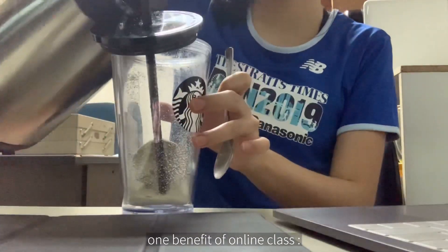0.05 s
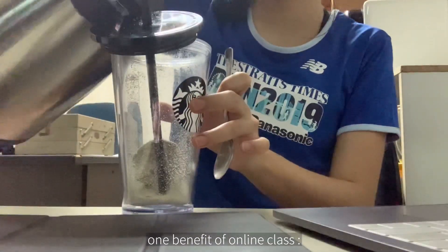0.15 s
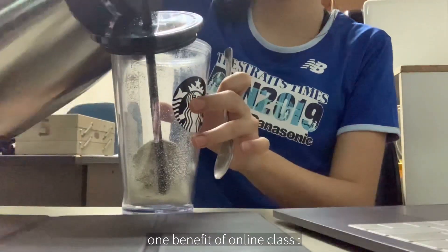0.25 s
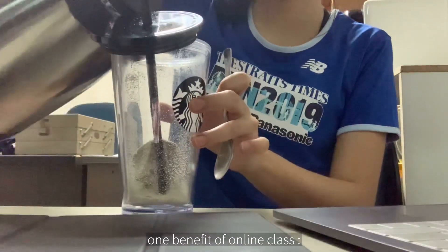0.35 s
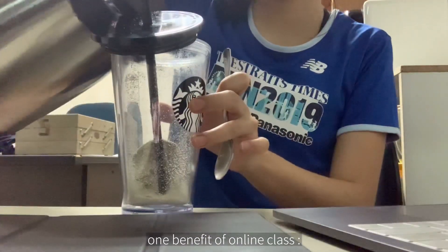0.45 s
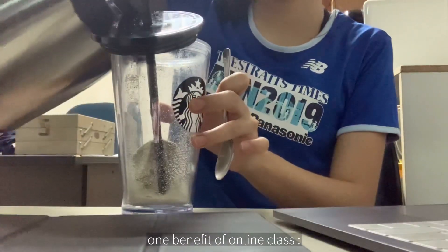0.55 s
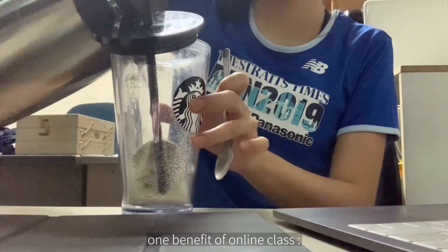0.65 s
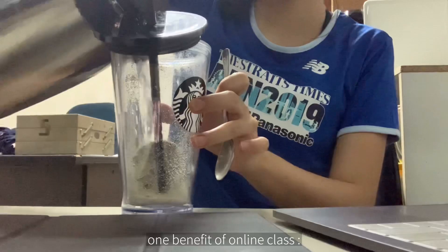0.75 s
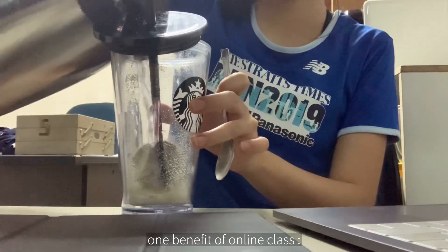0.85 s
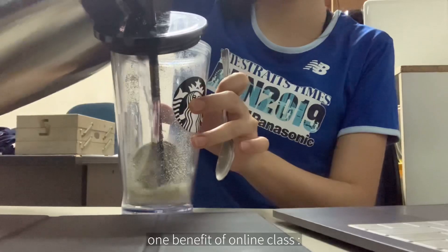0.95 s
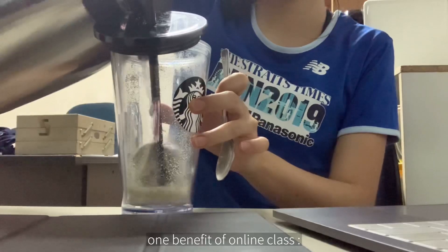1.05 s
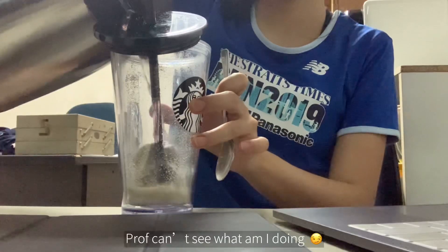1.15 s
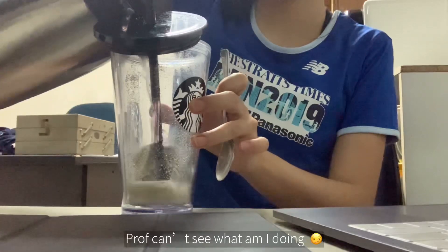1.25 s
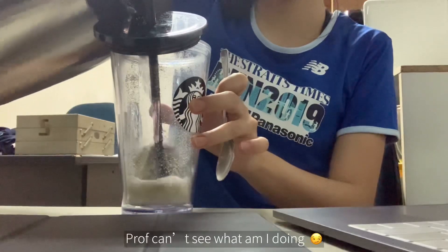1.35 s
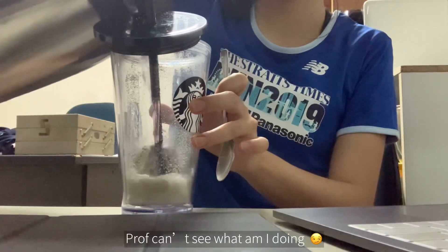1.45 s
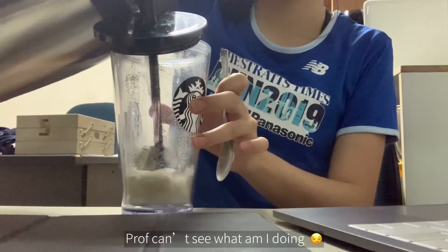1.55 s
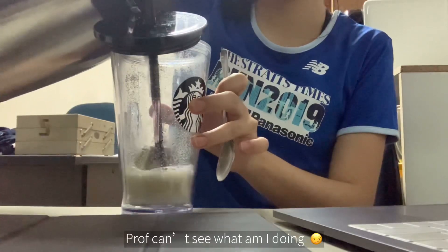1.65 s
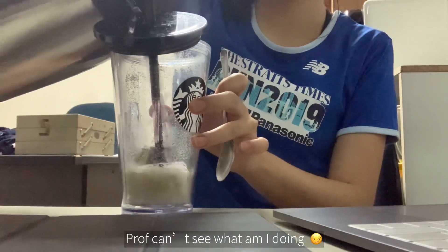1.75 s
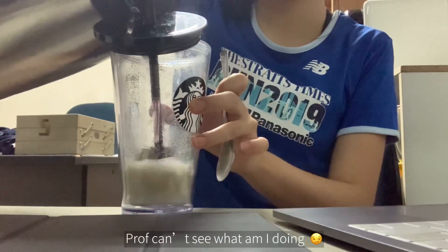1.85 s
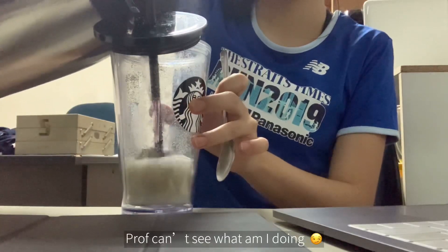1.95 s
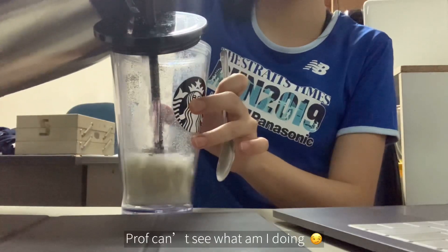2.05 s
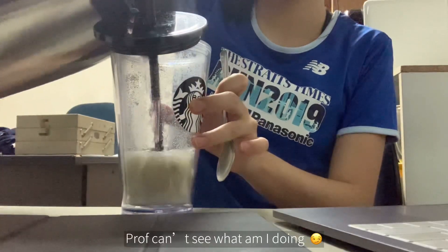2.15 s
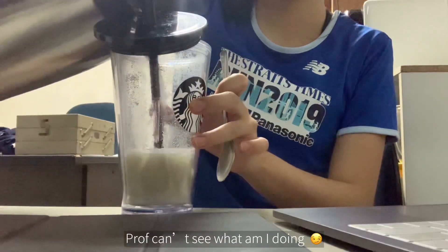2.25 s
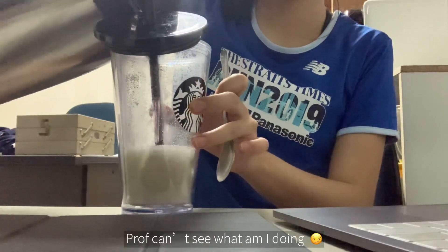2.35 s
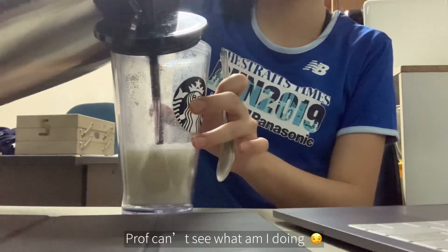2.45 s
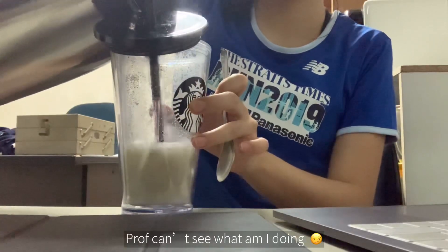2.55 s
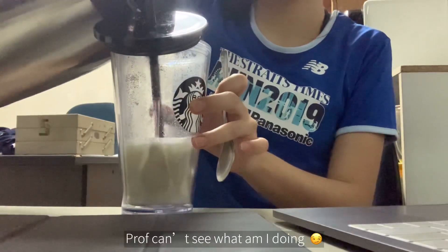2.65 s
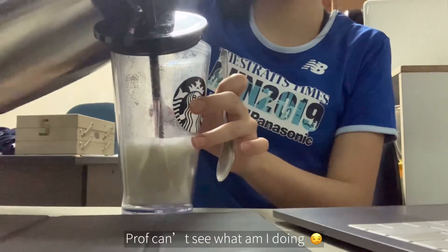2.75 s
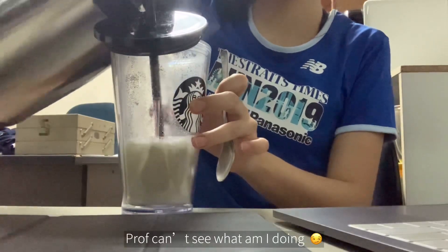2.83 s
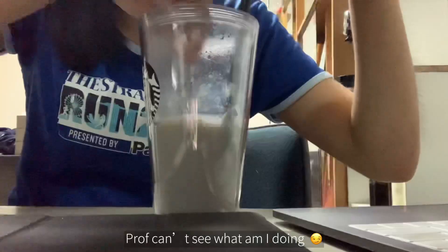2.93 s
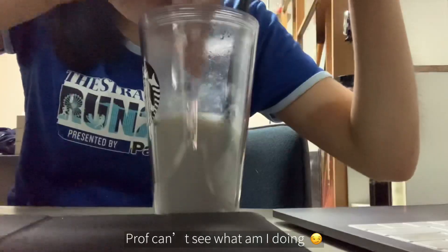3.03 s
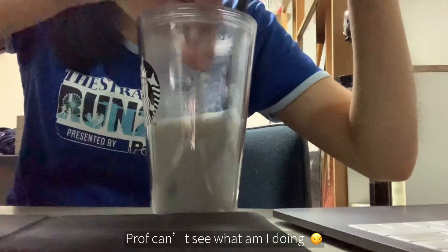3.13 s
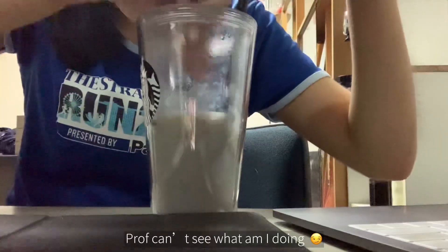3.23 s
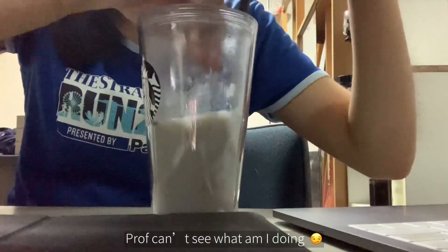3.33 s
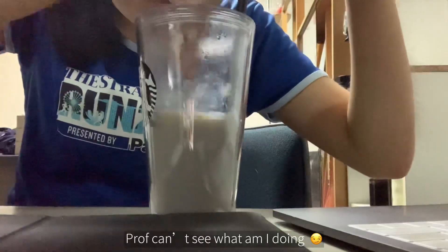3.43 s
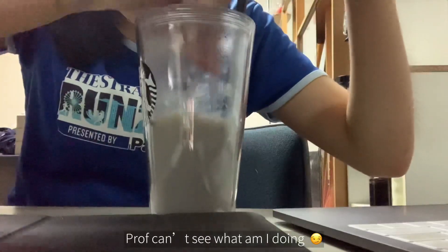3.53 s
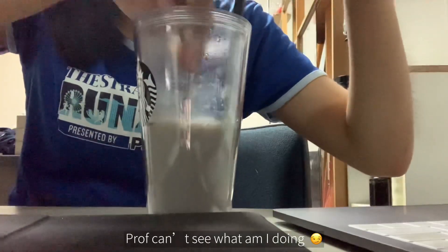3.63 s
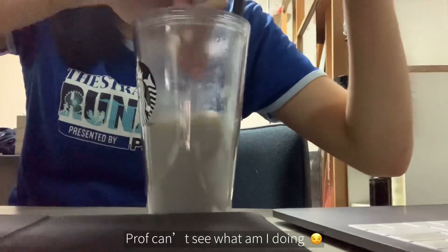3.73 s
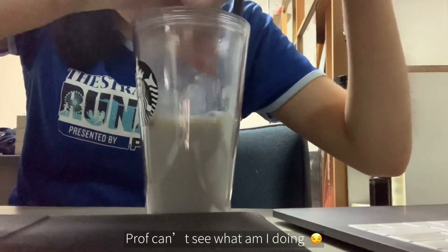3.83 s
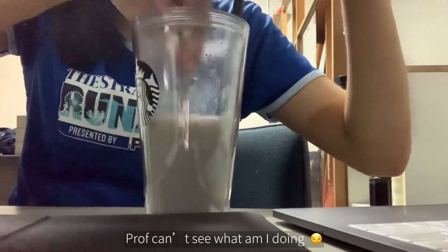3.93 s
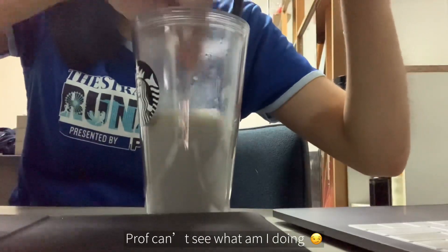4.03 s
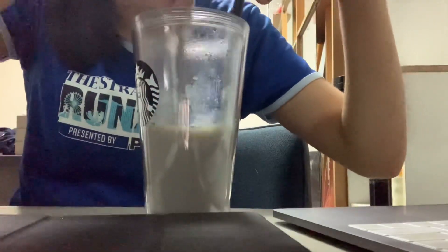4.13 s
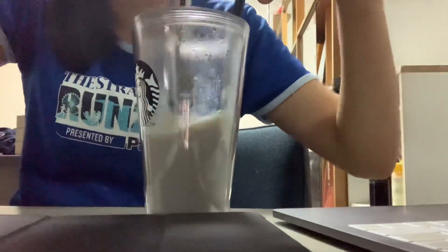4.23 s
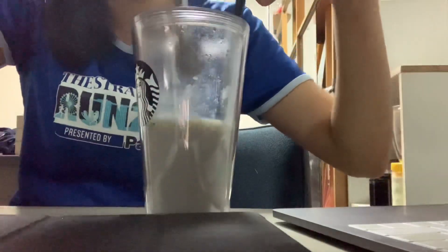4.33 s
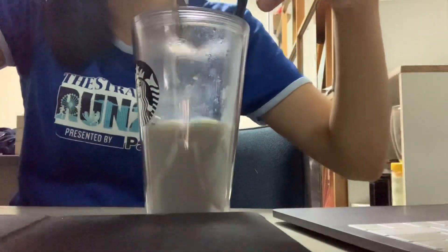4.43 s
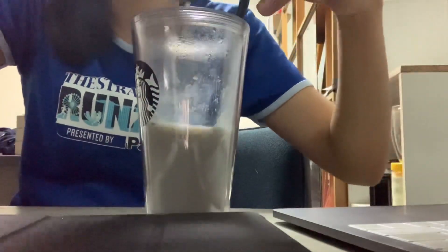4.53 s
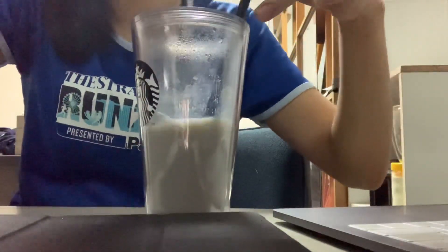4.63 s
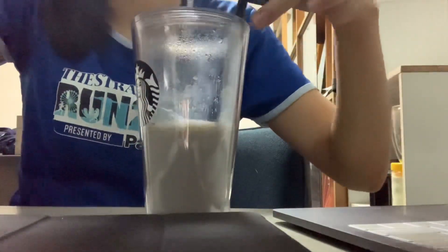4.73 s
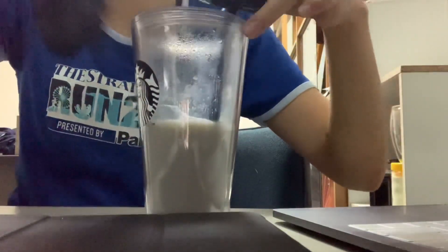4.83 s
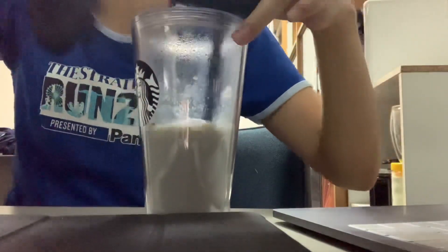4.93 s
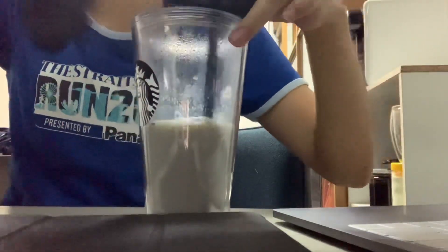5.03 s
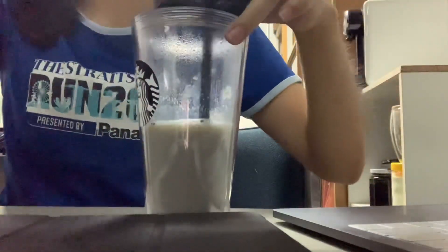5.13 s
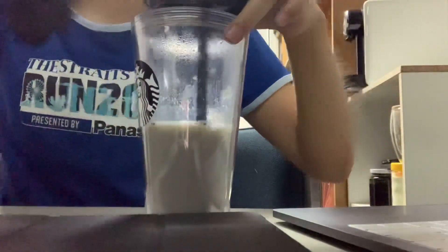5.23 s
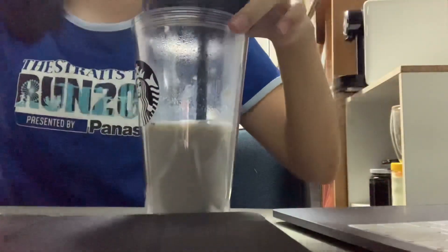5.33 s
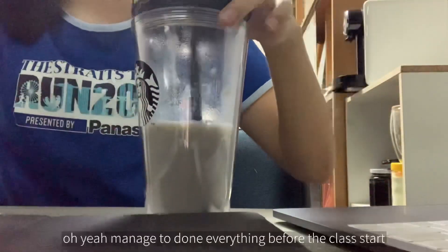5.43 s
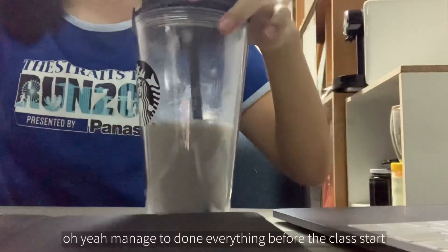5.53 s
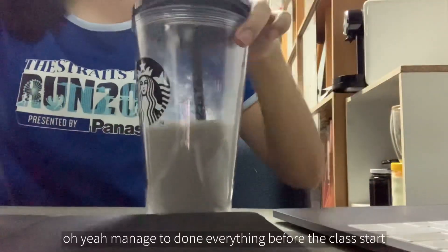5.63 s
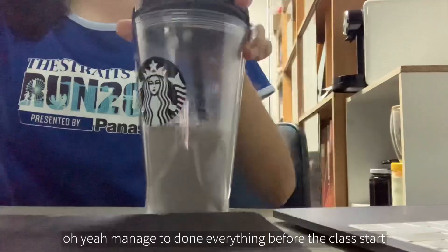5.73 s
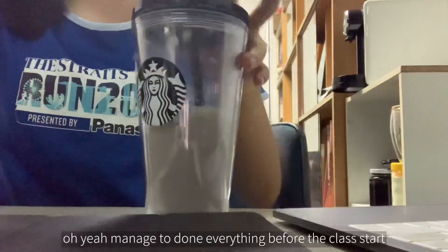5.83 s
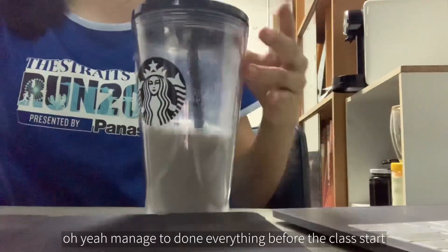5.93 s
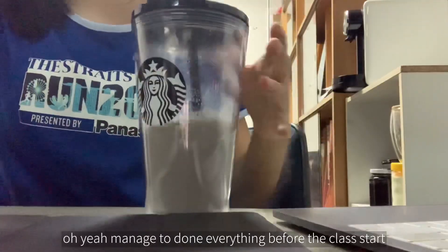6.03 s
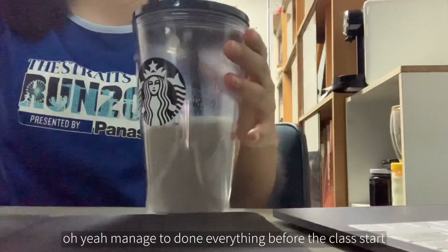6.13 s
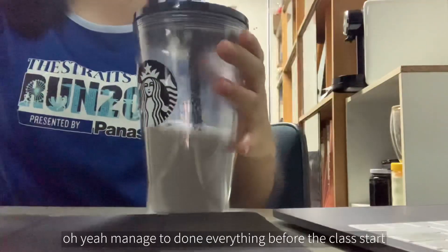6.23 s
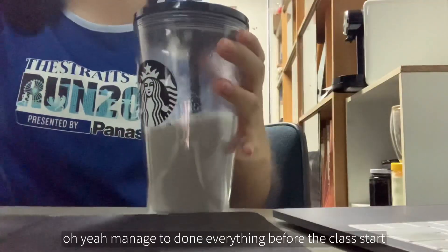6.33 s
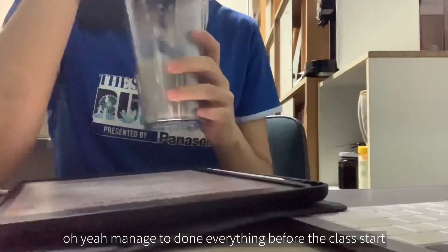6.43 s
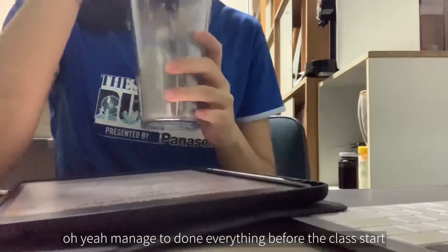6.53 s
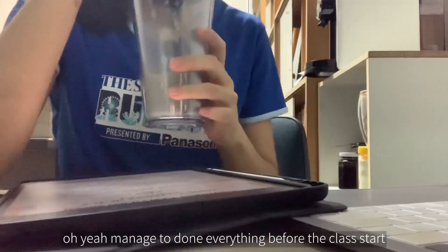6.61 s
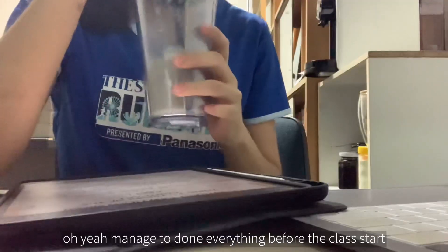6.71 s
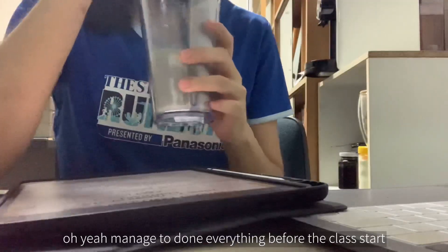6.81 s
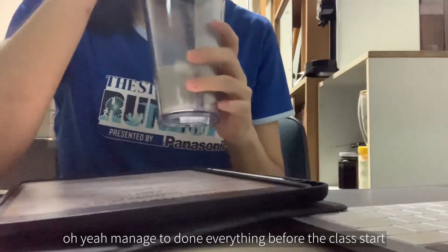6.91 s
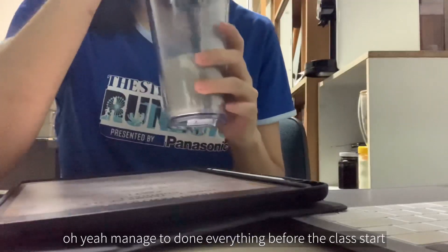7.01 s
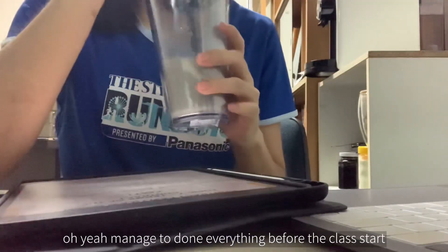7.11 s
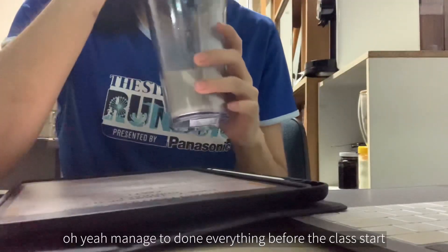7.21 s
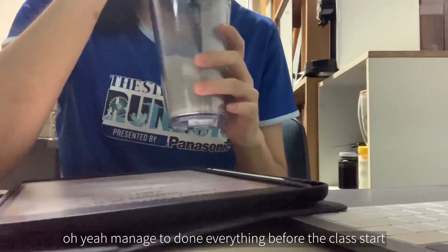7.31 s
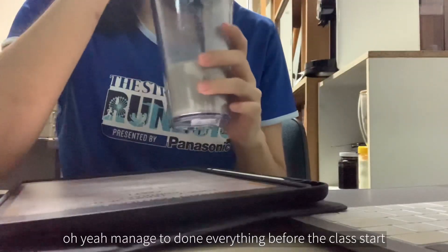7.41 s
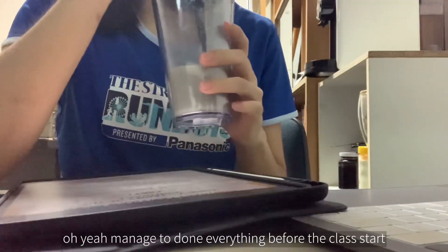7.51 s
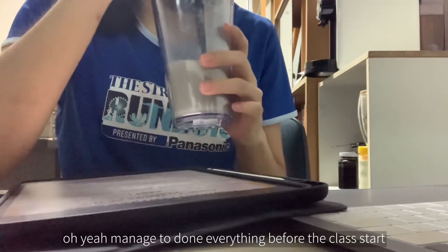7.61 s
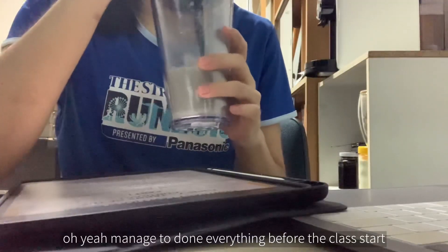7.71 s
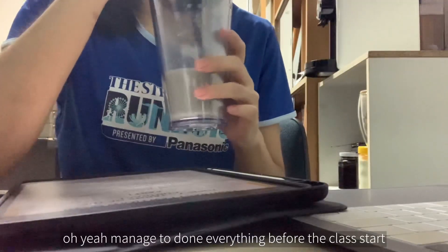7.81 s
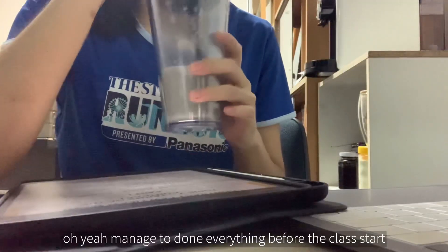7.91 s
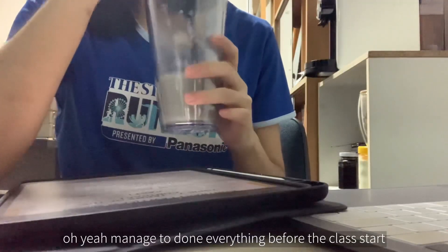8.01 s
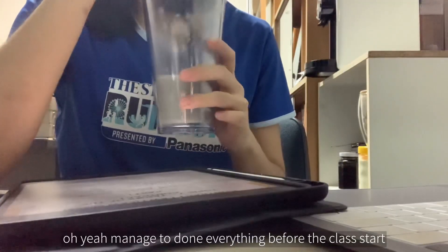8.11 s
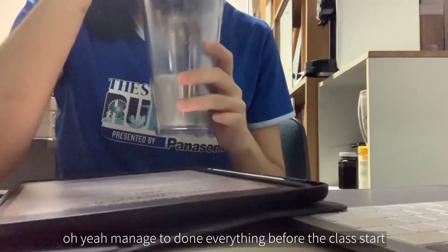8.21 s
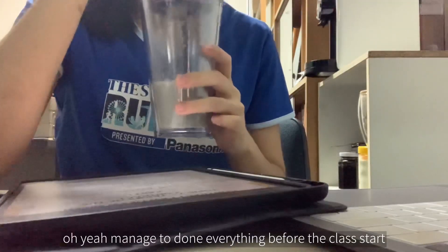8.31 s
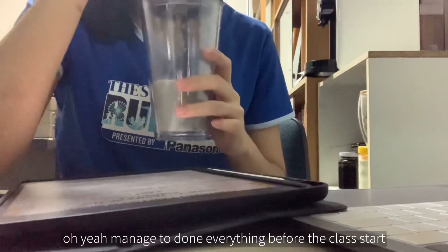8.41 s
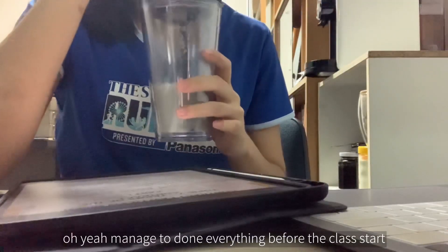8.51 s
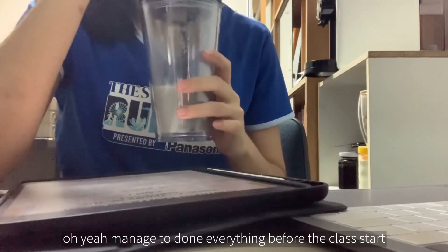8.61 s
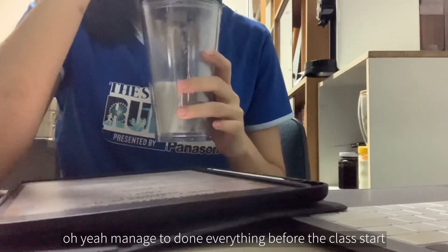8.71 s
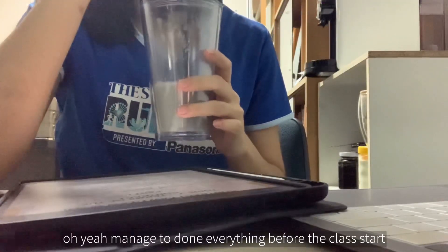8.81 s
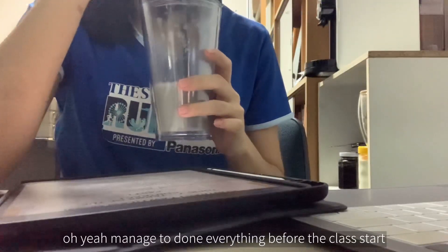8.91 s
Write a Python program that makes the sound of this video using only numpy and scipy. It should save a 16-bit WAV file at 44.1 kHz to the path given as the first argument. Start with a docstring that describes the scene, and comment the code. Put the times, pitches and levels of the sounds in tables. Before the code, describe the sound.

Close to the microphone at a desk in a small humming room, two soft thumps precede water pouring from a flask into a plastic tumbler, its hollow tone rising. A spoon stirs quickly with scrapes, clinks and hard plastic knocks. A straw ticks, a lid rubs into place, the desk thumps with paired clicks, then a short wet straw gurgle fades to near quiet.

```python
"""A small room hums and rumbles as shaped noise and wavering sines; two soft thumps ring the desk's modes.
Water runs from a flask onto powder in a plastic tumbler: noise grains patter, bubbles ring and the air column climbs.
A spoon scrapes in runs of tiny slips, clinks and knocks the side; the straw then ticks and scrapes by the lid.
The lid is rubbed on, the desk takes more thumps and two double clicks of short noise, and froth grains gurgle through
the straw in a short sip, with plops; a knock, a faint slide on plastic and a faint sine whistle end it."""
import sys
import numpy as np
from scipy import signal
from scipy.fft import rfft, irfft, next_fast_len
from scipy.io import wavfile
from scipy.ndimage import uniform_filter1d, map_coordinates

SR = 44100
rng = np.random.default_rng(int(sys.argv[2]) if len(sys.argv) > 2 else 0)


def dump_mix(stems):
    """Bounce the given channels to the path in sys.argv[1] as a 16-bit WAV at rate SR."""
    frames = np.atleast_2d(stems).T  # one column per channel
    limited = np.clip(frames, -1, 1)  # hard clip at full scale
    pcm = np.round(limited * 32767).astype(np.int16)
    wavfile.write(sys.argv[1], SR, pcm)


N = 395136

# Source levels are set ahead of the trims in scene(); spectrum levels are relative, as colours are scaled to rms 1.


def amp(db):
    """Decibels to gain."""
    return 10 ** (np.asarray(db) / 20)


def unit(x):
    """Scale to rms 1."""
    return x / np.sqrt(np.mean(x ** 2) + 1e-20)


def clock(size):
    """Seconds for each sample."""
    return np.arange(size) / SR


def along(points, hz):
    """Read a curve of (Hz, value) points on a log frequency axis."""
    f, v = np.transpose(points)
    return np.interp(np.log(hz + 1), np.log(f + 1), v)


def wobble(rate):
    """A smooth random curve, rate knots a second."""
    coarse = clock(N)[::64]
    knots = rng.standard_normal(1024)
    curve = map_coordinates(knots, [coarse * rate], mode="wrap")
    return np.interp(clock(N), coarse, curve)


def drift(x, swing_s, rate):
    """A randomly moving delay slides resonances up and down."""
    return map_coordinates(x, [np.arange(N) + SR * swing_s * wobble(rate)], mode="nearest")


def filtered(x, response):
    """Multiply the spectrum of x by a response of frequency."""
    n = x.shape[-1]
    padded = next_fast_len(n + SR // 8, real=True)
    hz = np.fft.rfftfreq(padded, 1 / SR)
    return irfft(rfft(x, padded) * response(hz), padded)[..., :n]


def coloured(x, spectrum):
    """Shape x by (Hz, dB) points, at rms 1."""
    return unit(filtered(x, lambda hz: amp(along(spectrum, hz))))


def resonate(x, modes):
    """Pass x through (Hz, width Hz, dB) resonances of alternating sign, at rms 1."""
    def response(f):
        total = 0
        for k, (centre, width, db) in enumerate(modes):
            band = 1j * f * width / (centre * centre - f * f + 1j * f * width)
            total = total + (-1) ** k * amp(db) * band
        return total
    return unit(filtered(x, response))


def grit(rate, spread_db):
    """Tiny random impulses of uneven size, about rate a second, at rms 1."""
    there = rng.random(N) < rate / SR
    size = amp(spread_db * np.clip(rng.standard_normal(N), -2, 2))
    return unit(there * rng.choice([-1, 1], N) * size)


def add(track, s, sound):
    """Mix a sound in at s seconds."""
    part = track[max(round(s * SR), 0):][:len(sound)]
    part += sound[:len(part)]


def gestures(rows, attack_s, sag_db_per_s, release_t60_s):
    """Gain over time: each move sets in, sags while it is held and dies away."""
    gain, t = np.zeros(N), clock(SR)
    for start_s, length_s, level_db in rows:
        sag_db = sag_db_per_s * np.minimum(t, length_s)
        release_db = 60 * np.maximum(t - length_s, 0) / release_t60_s
        add(gain, start_s, np.minimum(t / attack_s, 1) * amp(level_db - sag_db - release_db))
    return gain


def bursts(rows, spectrum, t60, variety):
    """Short noisy impacts that die at once, each colour varied by some dB at every point."""
    x, t = np.zeros(N), clock(SR // 6)
    for start_s, level_db in rows:
        colour = [(hz, db + variety * rng.standard_normal()) for hz, db in spectrum]
        add(x, start_s, amp(level_db - 60 * t / t60) * coloured(rng.standard_normal(len(t)), colour))
    return x


def ring(modes, pitch, attack):
    """A struck body: decaying sine modes, peak 1, with new mode strengths at each blow."""
    t = clock(SR // 3)
    x = np.zeros(len(t))
    for k, (hz, db, t60) in enumerate(modes):
        decay = amp(db + rng.normal(0, 0.9) - 60 * t / t60)
        x += (-1) ** k * decay * np.sin(2 * np.pi * hz * pitch * t)
    x = x * (1 - np.exp(-t / attack))
    return x / np.abs(x).max()


def bubble(hz, t60, glide):
    """A bubble rings from a soft start and rises in pitch as it decays."""
    t = clock(int(SR * t60) + 2)
    envelope = amp(-60 * t / t60) * (1 - np.exp(-t * hz))
    return envelope * np.sin(2 * np.pi * hz * t * (1 + glide * t / t60))


# fan noise colour: pitch_hz [Hz], level_db [dB per Hz, relative]
FAN_COLOUR = [(65, -23), (110, -6), (144, -6.5), (167, -15.5), (189, -6.5), (269, -11), (299, -8),
              (674, -27), (1430, -29.5), (1650, -33.5), (2080, -40.5), (2450, -41), (2780, -45),
              (14700, -50)]
# wavering hum tones: pitch_hz [Hz], level_db [dB]
HUM_TONES = [(48.4, -67), (134.6, -70), (199.5, -66), (301, -67.5), (398.4, -73)]
# the low rumble is quieter in the middle: start_s [s], level_db [dB]
RUMBLE_STEPS = [(0, -53), (2.9, -60), (4.1, -63), (6.6, -49)]


def background():
    """Fan noise, a wavering hum and a low rumble, alike at both ears only in the bass."""
    def pair(spectrum):
        mid, side = rng.standard_normal((2, N))
        side = filtered(side, lambda hz: amp(along([(60, -13.5), (300, 1.0), (800, 0.0)], hz)))
        return coloured(np.array([mid + side, mid - side]), spectrum)
    starts, levels = np.transpose(RUMBLE_STEPS)
    steps_db = levels[np.searchsorted(starts[1:], clock(N))]
    rumble_db = uniform_filter1d(steps_db, size=SR // 8)
    rumble_colour = [(10, -14.0), (25, 0.5), (50, 1.0), (75, 3.5), (110, -16.0), (200, -19.0), (600, -81.0)]
    rumble = amp(rumble_db) * pair(rumble_colour)
    hum = np.zeros(N)
    for pitch_hz, level_db in HUM_TONES:
        tone = np.sin(2 * np.pi * pitch_hz * clock(N) + 0.29 * wobble(3.4))
        hum += amp(level_db + 4.3 * wobble(5.1)) * np.sqrt(2) * tone
    fan = amp(-60.0) * pair(FAN_COLOUR)
    return (rumble + hum + fan) * amp([[1.6], [-1.6]])  # dB left, right


# a faint thin whistle: start_s [s], length_s [s], level_db [dB]
WHISTLES = [(8.8, .16, -77)]


def whistle():
    """A faint sine at 1770 Hz whose phase wanders a little."""
    tone = np.sin(2 * np.pi * 1770 * clock(N) + .5 * wobble(26))
    return gestures(WHISTLES, attack_s=0.0041, sag_db_per_s=6.5, release_t60_s=0.2) * tone


# fingers and straw slide on plastic: start_s [s], length_s [s], level_db [dB]
SLIDES = [(3.2, 0.16, -63.5), (3.385, 0.12, -71.5), (3.87, 0.17, -55), (4.07, 0.19, -64.5),
          (4.37, 0.22, -59.5), (4.56, 0.17, -64), (4.68, 0.45, -69), (5.13, 0.0094, -52),
          (5.18, 0.21, -61.5), (5.5, 0.447, -65), (6.12, 0.085, -63), (6.22, 0.24, -67),
          (7.52, 0.012, -56.5), (8.485, 0.039, -62.5)]
# colour of the slides: pitch_hz [Hz], level_db [dB per Hz, relative]
SLIDE_COLOUR = [(410, -35), (700, -12.5), (777, -10.5), (1110, -9.5), (1420, -5), (2330, -13.5),
                (3600, -15), (7490, -17), (12300, -22), (16000, -24.5)]


def rustle():
    """Fingers and straw slide over plastic in uneven little slips."""
    slips = amp(1.7 * wobble(36)) * coloured(grit(rate=6000, spread_db=4.5), SLIDE_COLOUR)
    return gestures(SLIDES, attack_s=0.0041, sag_db_per_s=6.5, release_t60_s=0.2) * slips


# the tumbler's foot shifts: start_s [s], length_s [s], level_db [dB]
SCUFFS = [(.555, 0.013, -42), (.655, 0.07, -50), (6.2, 0.1, -48.5)]


def scuffs():
    """The tumbler's foot shifts on the desk in dull grains."""
    colour = [(100, -7), (220, 4.0), (400, 1.5), (600, -14.0), (1500, -27.0), (9000, -60)]
    grains = coloured(grit(rate=400, spread_db=6.0), colour)
    return gestures(SCUFFS, attack_s=0.022, sag_db_per_s=5, release_t60_s=0.19) * grains


# the straw ticks against the lid: start_s [s], level_db [dB]
TICKS = [(4.860, -46), (4.925, -46.5), (4.970, -42), (5.050, -40.5)]
# colour of a tick: pitch_hz [Hz], level_db [dB]
TICK_COLOUR = [(1000, -49), (4000, -8), (9000, -5.5), (12000, 3), (16000, -12)]


def straw_ticks():
    """The straw taps the lid in tiny bursts of bright noise."""
    return bursts(TICKS, TICK_COLOUR, t60=0.0064, variety=2.0)


# blows that reach the desk: start_s [s], thump_db [dB], click_db [dB before a 3 dB cut], hardness_hz [Hz]
TAPS = [(0.258, -32, -75, 302), (0.575, -37, -59, 240), (3.11, -29.5, -58, 400), (3.328, -23.5, -46.5, 603),
        (5.832, -31, -59, 110), (6.393, -23, -32, 160), (6.614, -21, -19, 1100),
        (6.676, -23.5, -24.5, 1200), (6.828, -26, -24.5, 1000), (6.896, -25.5, -23, 900)]
# desk top modes, tuned down by DESK_PITCH: pitch_hz [Hz], level_db [dB], t60_s [s]
DESK_MODES = [(117.8, -3, .15), (199.4, -1.5, 0.14), (262.5, -12, 0.22), (345.8, -8, 0.22),
              (459, -16.5, 0.37), (612, -8.5, 0.14), (1068, -13, 0.063)]
DESK_PITCH = 0.95
# colour of the click: pitch_hz [Hz], level_db [dB]
CLICK_COLOUR = [(500, -12), (1500, 5.5), (2500, -9.5), (4000, 2), (5000, -1), (6600, 4.5), (9000, -5.5),
                (13000, -10), (16000, -18.5)]
# things jostled on the desk: pitch_hz [Hz], level_db [dB]
JOSTLE_COLOUR = [(80, -4.5), (200, 2.5), (450, 3), (800, -4), (1100, -7), (7000, -76)]


def taps():
    """A hard little click, then the boom of the desk and the jostle of things on it. Gives (clicks, stereo boom)."""
    clicks, boom, t = np.zeros(N), np.zeros((2, N)), clock(SR // 3)
    for start_s, thump_db, click_db, hardness_hz in TAPS:
        snap = amp(-60 * t / 0.0028)
        after = amp(-23.5) * amp(-60 * t / 0.088)
        click = coloured(rng.standard_normal(len(t)), CLICK_COLOUR) * (snap + after)
        add(clicks, start_s, amp(click_db - 3.0) * click)
        # a soft blow wakes only the low modes
        modes = [(hz, db - 10 * np.log10(1 + (hz / hardness_hz) ** 4), t60) for hz, db, t60 in DESK_MODES]
        for side in boom:
            jostle = coloured(rng.standard_normal(len(t)), JOSTLE_COLOUR) * amp(-60 * t / 0.22)
            thump = ring(modes, DESK_PITCH, attack=0.0027)
            add(side, start_s, amp(thump_db) * (thump + amp(-14) * jostle))
    return clicks, boom


# pulls on the straw: start_s [s], length_s [s], level_db [dB]
SUCKS = [(7.137, 0.07, -45.5), (7.177, 0.05, -43), (7.251, 0.072, -48), (7.284, 0.0025, -40.5),
         (7.306, 0.075, -54), (7.391, .11, -60), (7.71, 0.088, -75), (7.805, 0.059, -67), (8.76, 0.19, -74)]
# the straw scrapes in the lid's hole: start_s [s], length_s [s], level_db [dB]
SCRAPES = [(4.18, 0.031, -54), (4.985, 0.034, -49.5), (5.218, 0.024, -47.5)]
# straw resonances, shifted at random for each pull: pitch_hz [Hz], width_hz [Hz], level_db [dB]
STRAW_MODES = [(1560, 600, -3), (1876, 132, 3), (2530, 156, -11), (3190, 250, -12.5), (4070, 300, -7),
               (6320, 660, -10.5), (7950, 470, -13.5), (10970, 730, -19.5)]
SUCK_FULL_DB, SUCK_DULLING = -28, 0.8  # below this level the treble falls by so many dB per dB
GURGLE_SPREAD = 0.045  # relative shift of each resonance from pull to pull


def sip():
    """The straw rings when it scrapes and when froth crackles through it; weaker pulls are duller."""
    froth = np.zeros(N)
    for start_s, length_s, level_db in SUCKS:
        modes = [(hz * np.exp(GURGLE_SPREAD * rng.standard_normal()), width, db) for hz, width, db in STRAW_MODES]
        tilt_db = min(level_db - SUCK_FULL_DB, 0) * SUCK_DULLING
        crackle = resonate(grit(rate=1800, spread_db=10.5), modes)
        pull = coloured(crackle, [(2000, -7.5), (5000, tilt_db), (11000, tilt_db), (13000, -35)])
        row = (start_s, length_s, level_db)
        froth += gestures([row], attack_s=0.0053, sag_db_per_s=87, release_t60_s=0.075) * pull
    # the straw's resonances glide slowly
    gurgle = amp(1.5 * wobble(50)) * drift(froth, swing_s=.0022, rate=6)
    rub = resonate(grit(rate=5400, spread_db=14.0), STRAW_MODES)
    dull = filtered(rub, lambda hz: 1 / (1 + (hz / 3000) ** 4))
    return gurgle + gestures(SCRAPES, attack_s=0.0095, sag_db_per_s=30, release_t60_s=0.1) * dull


# cup shaking the desk: pitch_hz [Hz], level_db [dB]
THUD_COLOUR = [(40, -21.5), (90, -4.5), (135, -3), (180, -2.5), (240, -16), (305, -6.5), (380, -13.5),
               (600, -20), (1500, -67.5)]


def scrape(strokes, shape, spectrum, slip_rate, hollow_db):
    """Each stroke is a run of tiny slips that rings the cup and shakes the desk under it."""
    slips = coloured(grit(rate=slip_rate, spread_db=4), spectrum)
    rub = drift(slips, swing_s=.0008, rate=12)  # the ring shifts as the contact travels
    dull = filtered(rub, lambda f: 1 / (1 + (f / 1800) ** 4))
    hollow = amp(hollow_db) * resonate(grit(rate=2500, spread_db=-7.5), [(759, 11, 0)])
    thud = coloured(rng.standard_normal(N), THUD_COLOUR)
    start, length, db, thump_db, bright_db = np.transpose(strokes)
    body = gestures(zip(start, length, db), *shape) * (dull + hollow)
    edge = gestures(zip(start, length, db + bright_db), *shape) * (rub - dull)
    # the desk rings on after a stroke
    thump_gain = gestures(zip(start, length, db + thump_db), attack_s=0.0098, sag_db_per_s=37, release_t60_s=0.16)
    return body + edge + thump_gain * thud


# the lid rubs over the rim: start_s [s], length_s [s], level_db [dB], thump_db and bright_db [dB re level_db]
LID_STROKES = [(5.277, 0.0087, -27, -20, -4.5), (5.30, 0.037, -55, -22, 9), (5.355, 0.041, -43, -22, -17),
               (5.40, 0.0655, -49.5, -7, -1.5), (5.461, 0.021, -27.5, -8.5, -1), (5.51, 0.14, -55, 0.5, -6),
               (5.622, 0.04, -37.5, -9, -8.5), (5.67, 0.22, -51.5, -17, -15), (5.755, 0.027, -37, -9, -29),
               (5.808, 0.041, -34, -9, -6)]
# colour of the lid's rub: pitch_hz [Hz], level_db [dB]
LID_COLOUR = [(150, -24.5), (300, 1.5), (520, -3.5), (950, -10.5), (1500, -7), (2000, -27), (2500, -17),
              (5000, -26), (8500, -22), (15000, -30)]


def lid_rub():
    """The lid slips over the rim in dense fine grains as it is pressed on."""
    shape = (0.018, 42, 0.08)  # attack s, sag dB per s, release t60 s
    return scrape(LID_STROKES, shape, LID_COLOUR, slip_rate=2500, hollow_db=-47)


# spoon strokes: start_s [s], length_s [s], level_db [dB], thump_db and bright_db [dB re level_db]
STIR_STROKES = [(2.827, 0.045, -40, -5.5, -5.5), (2.965, 0.027, -35.5, -10, -1.5),
                (3.017, 0.024, -43, -8.5, -12.5), (3.084, 0.039, -37, 0, -9.5),
                (3.142, 0.038, -31, -20.5, -6.5), (3.292, 0.022, -45.5, -13, 14),
                (3.319, 0.042, -33.5, 3.5, 1.5), (3.472, 0.051, -42.5, 2.5, -2.5),
                (3.521, 0.013, -29.5, -7.5, 4.5), (3.555, 0.021, -34, -2.5, -14.5),
                (3.617, 0.25, -59, -7, 7.5), (3.674, 0.022, -36.5, -5, 6), (3.699, 0.038, -38.5, 3, -13),
                (3.809, 0.037, -32, -8, 2.5), (3.861, 0.012, -42, 0.5, -5), (3.949, 0.022, -35.5, 0, -10),
                (4.01, 0.0087, -29.5, -5.5, 3)]
# colour of the spoon's rub: pitch_hz [Hz], level_db [dB]
SPOON_COLOUR = [(210, -48), (350, -1.5), (650, -14), (800, 4), (1400, -4.5), (1680, -1), (2100, -10.5),
                (2540, -8.5), (3700, -12.5), (4600, -20), (9000, -27.5), (15000, -37)]
STIR_ATTACK_S = 0.012


def stir():
    """The spoon scrapes the tumbler in coarse slips, with the cup's hollow ring."""
    shape = (STIR_ATTACK_S, 70, 0.072)  # attack s, sag dB per s, release t60 s
    return scrape(STIR_STROKES, shape, SPOON_COLOUR, slip_rate=670, hollow_db=-2.5)


# the spoon's own ring: pitch_hz [Hz], level_db [dB], t60_s [s]
SPOON_MODES = [(1730, 0.5, .09), (2180, -12, .1), (2466, -3, 0.24), (3460, -4, 0.09)]
CLINK_DB = -8.5  # re the level of the stroke


def clinks():
    """The spoon's own modes ring as each stroke bites."""
    x = np.zeros(N)
    for start_s, _, level_db, *_ in STIR_STROKES:
        add(x, start_s + STIR_ATTACK_S, amp(level_db + CLINK_DB) * ring(SPOON_MODES, 1, attack=.001))
    return x


# spoon, lid and straw knock on the tumbler:
# start_s [s], level_db [dB, peak of the ring], pitch [factor], crack_db [dB re level_db]
KNOCKS = [(0.258, -38, 1.02, -11.5), (2.979, -33, 2.6, -7.5), (2.988, -27.5, 1.08, -3),
          (3.102, -33.5, 1.05, -10), (3.115, -30.5, 1.1, -24), (3.159, -33.5, 1.93, -14.5),
          (3.171, -35, 0.99, -12), (3.3264, -19, 1.11, -4), (3.343, -19, 1.01, -18),
          (3.362, -26.5, 0.9, -8.5), (3.491, -19, 0.98, -20), (3.525, -27.5, 1.33, -6.5),
          (3.5355, -18, 0.66, 1.5), (3.564, -19, 1.14, -12.5), (3.583, -29.5, 0.84, -7.5),
          (3.6945, -17, 0.73, 2), (3.712, -24.5, 1.23, -13), (3.83, -27, 1.25, -5),
          (3.840, -20, 0.8, -16.5), (3.875, -32.5, 0.61, -14.5), (3.952, -23, 0.99, -6),
          (3.9742, -20, 1.0, -17), (4.0117, -20.5, 1.07, -13), (4.019, -24, 0.91, -6),
          (4.030, -11, 0.96, -10.5), (5.2779, -17, 1.33, -21), (5.286, -21, 0.97, -15.5),
          (5.479, -20, 0.57, -12), (5.489, -28, 0.48, -21), (5.644, -30.5, 1.36, -18),
          (5.773, -35.5, 1.27, -11), (5.829, -27.5, 1.12, -5.5), (5.849, -27.5, 1.34, -22),
          (6.096, -39.5, 0.76, -34), (6.445, -38, 0.974, -8), (7.291, -23.5, 1.82, -9.5),
          (8.274, -43.5, 0.97, -22)]
# tumbler wall modes, scaled by each knock's pitch: pitch_hz [Hz], level_db [dB], t60_s [s]
WALL_MODES = [(817, 7, 0.021), (1055, 6, 0.029), (1235, -3, 0.016), (1690, -1, 0.014), (2550, -14.5, 0.03),
              (2840, -15, 0.016), (3990, -23, 0.018)]
# colour of a crack: pitch_hz [Hz], level_db [dB]
CRACK_COLOUR = [(150, -8.5), (450, 1.5), (1800, -2.5), (3500, -6), (5000, -16.5), (9000, -22), (15000, -26)]


def knocks():
    """A hit on the plastic wall: a broad crack and a few cycles of ring."""
    x, t = np.zeros(N), clock(SR // 3)
    for start_s, level_db, pitch, crack_db in KNOCKS:
        crack = amp(crack_db - 60 * t / 0.0099) * coloured(rng.standard_normal(len(t)), CRACK_COLOUR)
        add(x, start_s, amp(level_db) * (ring(WALL_MODES, pitch, attack=0.00056) + crack))
    return x


# heavier drops: start_s [s], level_db [dB before SPAT_DB]
SPATS = [(0.8524, -37), (.905, -33.5), (.918, -33), (.946, -32.5), (0.9606, -26.5), (.974, -28.5),
         (.995, -30), (1.006, -33), (1.059, -30),  (1.1804, -35.5), (1.456, -37), (1.5945, -37.5),
         (1.7096, -34.5), (2.001, -33.5), (2.058, -31), (2.1132, -35.5), (2.3213, -33.5), (2.44, -33.5),
         (2.5462, -36.5), (2.7564, -36)]
# colour of a drop, varied each time: pitch_hz [Hz], level_db [dB]
SPAT_COLOUR = [(250, -13), (700, -1), (1000, -7), (1750, -1.5), (2300, -17), (3200, 1.5), (4300, -19),
               (5500, -13), (13000, -18.5), (16000, -23)]
SPAT_DB = -9.5


def spats():
    """Heavier drops slap into the drink as short noise bursts."""
    return amp(SPAT_DB) * bursts(SPATS, SPAT_COLOUR, t60=0.042, variety=5.9)


# the stream opens, runs evenly and is cut off
POUR_START_S, POUR_FULL_S, POUR_STOP_S, POUR_CLOSE_S = .62, 0.75, 2.81, 0.08
# the air above the drink rings higher and louder as the cup fills
COLUMN_HZ, COLUMN_HZ_PER_S, COLUMN_DB, COLUMN_DB_PER_S = 607, 72, -77.5, 11.5


def filling(s):
    """Seconds of pouring that the cup holds at time s."""
    return np.clip(s, POUR_START_S, POUR_STOP_S) - POUR_START_S


def column_pitch(s):
    """The air column shortens as the drink rises, so its pitch in Hz climbs."""
    return COLUMN_HZ + COLUMN_HZ_PER_S * filling(s)


# small single bubbles: start_s [s], level_db [dB], pitch_hz [Hz at the start of the ring]
BUBBLES = [(1.058, -35.5, 4180), (1.181, -44, 3100), (1.34, -31, 6540), (1.346, -36.5, 3330),
           (1.392, -35, 3265), (1.407, -35.5, 3250), (1.429, -39, 3300), (2.318, -42, 3120),
           (2.678, -35, 4410), (4.105, -37.5, 6330)]
# large plops at the air column's pitch of the moment: start_s [s], level_db [dB]
PLOPS = [(1.595, -44), (2.113, -32), (2.548, -31.5), (2.672, -36), (2.727, -29), (7.092, -22.5),
         (7.145, -32)]
BUBBLE_CYCLES, PLOP_T60_S = 76, 0.057  # a small bubble's t60 in cycles, a plop's in s


def plops():
    """Single bubbles burst with a tick: small ones ring at their own pitch, large ones at the air column's."""
    x = np.zeros(N)
    small = [(s, db, hz, BUBBLE_CYCLES / hz) for s, db, hz in BUBBLES]
    large = [(s, db, column_pitch(s), PLOP_T60_S) for s, db in PLOPS]
    for start_s, level_db, pitch_hz, t60_s in small + large:
        tone = bubble(pitch_hz, t60_s, glide=0.039)
        noise = coloured(rng.standard_normal(len(tone)), CRACK_COLOUR)
        tick = amp(-25.5) * amp(-60 * clock(len(tone)) / 0.0252) * noise
        add(x, start_s, amp(level_db) * (tone + tick))
    return x


def fizz(count):
    """A swarm of droplets, each a few cycles at its own pitch, at rms 1 while the stream runs."""
    x, length_s = np.zeros(N), POUR_STOP_S - POUR_START_S
    for when, size, strength in rng.random((count, 3)):
        hz = 1100 * 12 ** size
        droplet = bubble(hz, 17 / hz, glide=0.078)
        add(x, POUR_START_S + when * length_s, amp(-26 * strength - 1.5 * size) * droplet)
    return unit(x) * np.sqrt(length_s * SR / N)


# colour of the spray: pitch_hz [Hz], level_db [dB]
SPLASH_COLOUR = [(250, -2), (550, -11), (730, -8), (1050, -22.5), (1800, -14), (2300, -22.5), (3200, -7.5),
                 (3900, -19.5), (5000, -17.5), (13000, -18.5), (16000, -26)]
# upper air modes of the cup: pitch_hz [Hz], width_hz [Hz], level_db [dB]
CUP_AIR_MODES = [(1880, 62, -7), (3200, 220, 7), (4240, 130, 10.5), (6600, 630, 4.5)]
# colour of the churned drink: pitch_hz [Hz], level_db [dB]
CHURN_COLOUR = [(350, -33), (650, -1), (1000, -8.5), (1800, -1.5), (2300, -25.5), (4000, -31)]
SPLASH_DB = -57.5
# the first gush hits the dry powder harder
GUSH_S, GUSH_WIDTH_S, GUSH_DB = 0.95, 0.066, 7
# the deeper the drink, the more the stream churns it
CHURN_DB, CHURN_DB_PER_S = -70.5, 2


def pour():
    """The stream patters in fine droplets; the shrinking air column rings ever higher. Gives (wash, droplets)."""
    t = clock(N)
    splash_db = SPLASH_DB + GUSH_DB * np.exp(-((t - GUSH_S) / GUSH_WIDTH_S) ** 2)
    # spray and cup air swell together in random clumps
    clumps = filtered(np.abs(grit(rate=180, spread_db=-6.5)), lambda f: 1 / (1 + 1j * f / 55))
    spatter = unit(1.04 + unit(clumps))
    spray = coloured(grit(rate=800, spread_db=3.5), SPLASH_COLOUR)
    cup_air = resonate(grit(rate=230, spread_db=14), CUP_AIR_MODES)
    cup = amp(-8.5) * drift(cup_air, swing_s=0.0013, rate=12)
    splash = amp(splash_db) * spatter * (spray + cup)
    # slow random swells drive the air column's tone
    swell = unit(filtered(grit(rate=340, spread_db=1.5), lambda f: 1 / (1 + 1j * f / 50) / (1 + 1j * f / 170)))
    tone = np.sqrt(2) * np.sin(2 * np.pi * np.cumsum(column_pitch(t)) / SR)
    column = amp(COLUMN_DB + COLUMN_DB_PER_S * filling(t)) * swell * tone
    churn_db = CHURN_DB + CHURN_DB_PER_S * filling(t) + 4.4 * wobble(45)
    churn = amp(churn_db) * coloured(grit(rate=260, spread_db=6), CHURN_COLOUR)
    corners_s = [POUR_START_S, POUR_FULL_S, POUR_STOP_S, POUR_STOP_S + POUR_CLOSE_S]
    running = np.interp(t, corners_s, [0, 1, 1, 0]) ** 2
    droplets = amp(splash_db - 11.5) * fizz(count=750)
    return running * (churn + splash + column), running * droplets


# decay of the room: pitch_hz [Hz], t60_s [s]
ROOM_DECAY = [(100, 0.45), (500, 0.25), (2000, 0.24), (6000, 0.21), (14000, 0.26)]


def room(x, early_db, late_db):
    """Close surfaces give a short sparse scatter, the walls a longer tail; both are drawn afresh six times a second."""
    out, step = np.zeros((2, N + SR)), SR // 6
    for i in range(0, N, step):
        hz, t, z = signal.stft(rng.standard_normal((2, SR // 3)), SR, nperseg=256)
        decay = amp(-60 * t / along(ROOM_DECAY, hz)[:, None])
        late = signal.istft(z * decay, SR, nperseg=256)[1]
        surfaces = rng.random(late.shape) < .08
        early = surfaces * rng.choice([-1, 1], late.shape) * amp(-60 * clock(late.shape[1]) / 0.028)
        early = early / np.linalg.norm(early, axis=1, keepdims=True)
        tail = amp(early_db) * early + amp(late_db) * late / np.linalg.norm(late[0])
        echo = signal.fftconvolve(x[None, i:i + step], tail, axes=1)
        out[:, i + SR // 1000:][:, :echo.shape[1]] += echo  # echoes start 1 ms late
    return out[:, :N]


def ports(x, lag):
    """Direct sound reaches the two microphones lag seconds apart."""
    return filtered(x, lambda f: np.exp(1j * np.pi * f * lag * np.array([[-1], [1]])))


def scene():
    """Cup and desk sounds, direct and through the room, over the background."""
    wash, droplets = pour()
    small = rustle() + sip() + whistle() + scuffs() + straw_ticks()
    rubs = stir() + lid_rub()
    blows = knocks() + clinks() + plops() + droplets + spats()
    clicks, boom = taps()
    # this group arrives largely by reflection
    inside = wash + small + amp(-1.5) * rubs
    near = amp(-4.0) * inside + amp(-1.5) * blows + amp(-1.5) * clicks
    direct = ports(near, lag=.00007) + boom * amp([[2], [-2]])  # dB left, right
    send = amp(3.0) * inside + blows + amp(5.0) * clicks + amp(-1) * boom.mean(axis=0)
    reflected = room(send, early_db=-1, late_db=-9.5)
    # a small random delay wavers in the echoes and smooths their colour
    echoes = np.array([drift(side, swing_s=.00017, rate=22) for side in reflected])
    return direct + echoes + background()


TOP_HZ = 15900


def record(dry):
    """The recorder's treble rolls off and ends at its band limit."""
    return filtered(dry, lambda hz: amp(along([(13500, 0.5), (15900, -11.0)], hz)) * (hz < TOP_HZ))


dry = scene()
out = record(dry)
dump_mix(out)
```